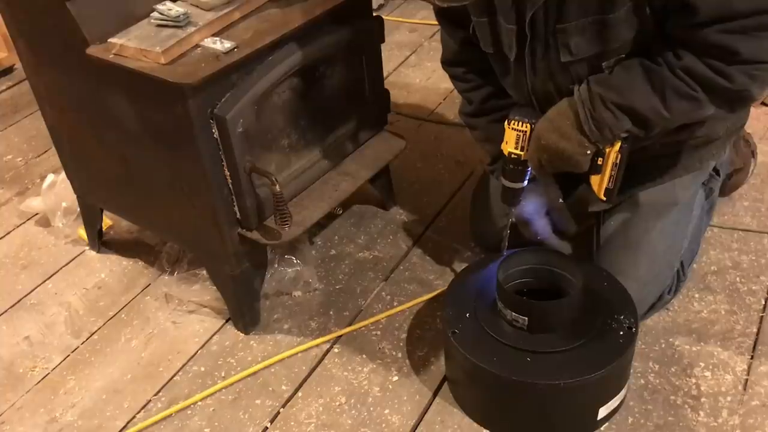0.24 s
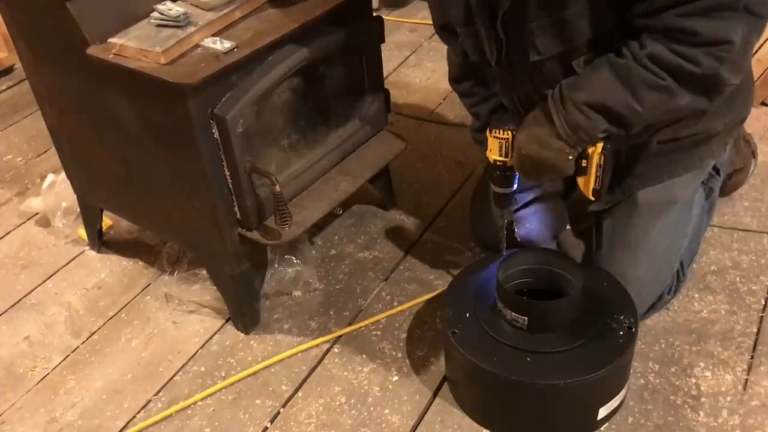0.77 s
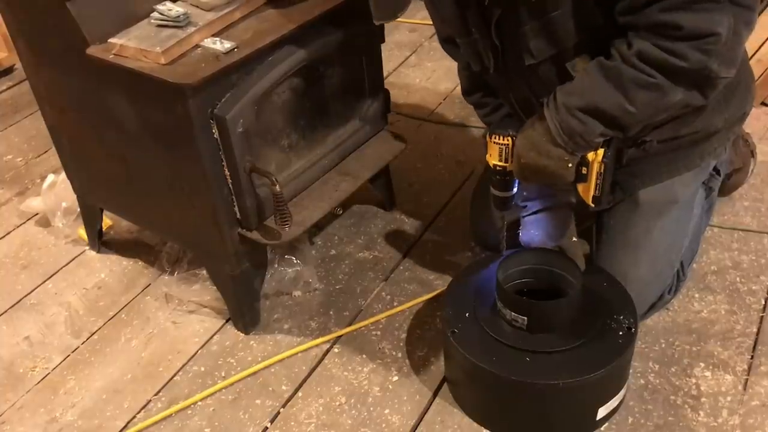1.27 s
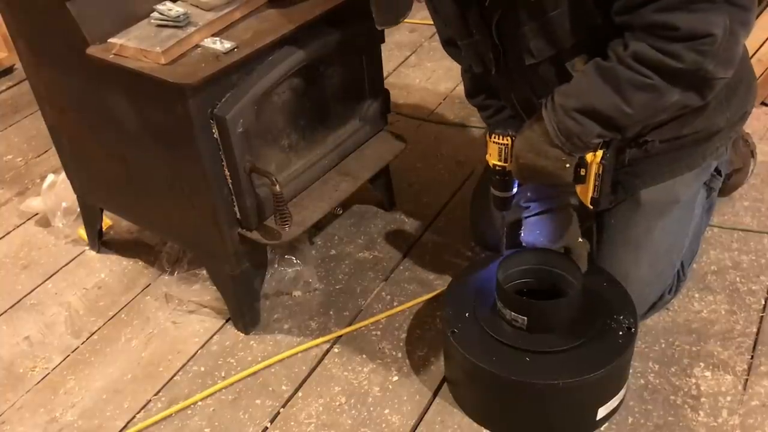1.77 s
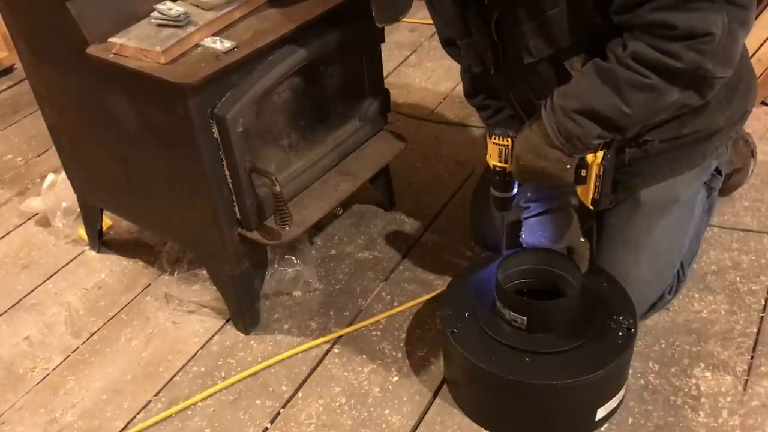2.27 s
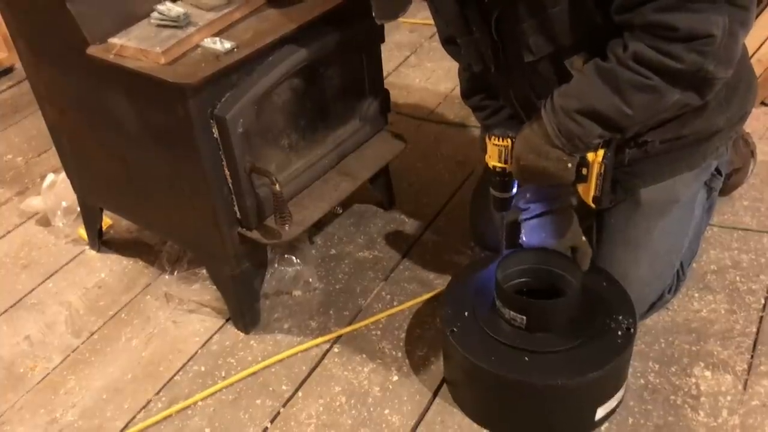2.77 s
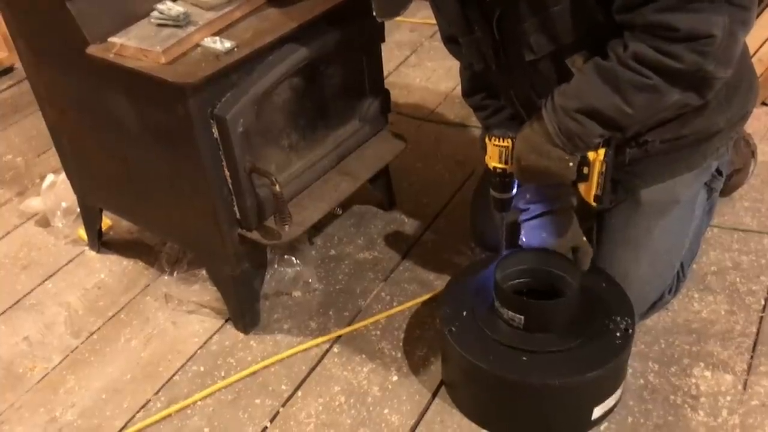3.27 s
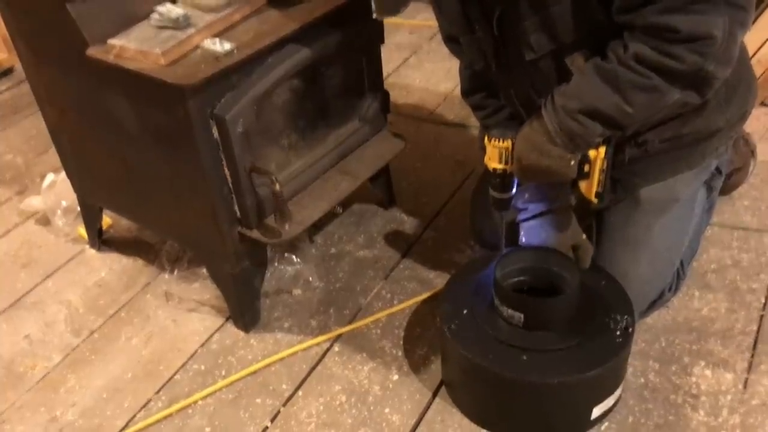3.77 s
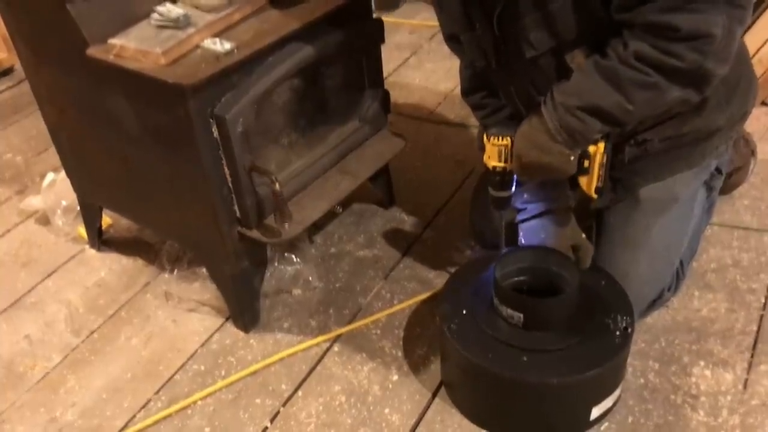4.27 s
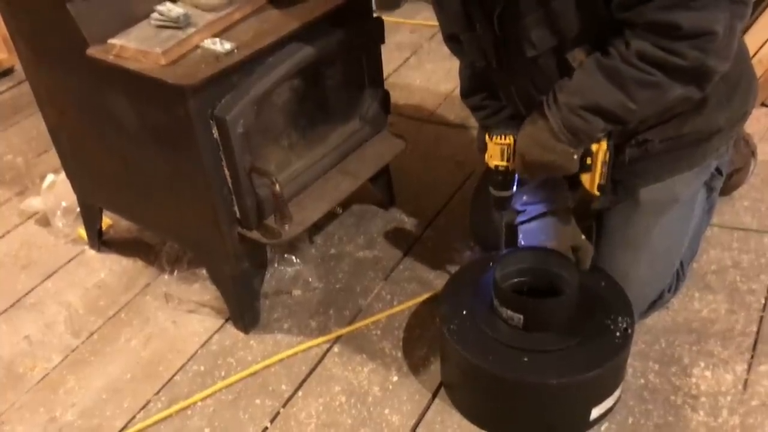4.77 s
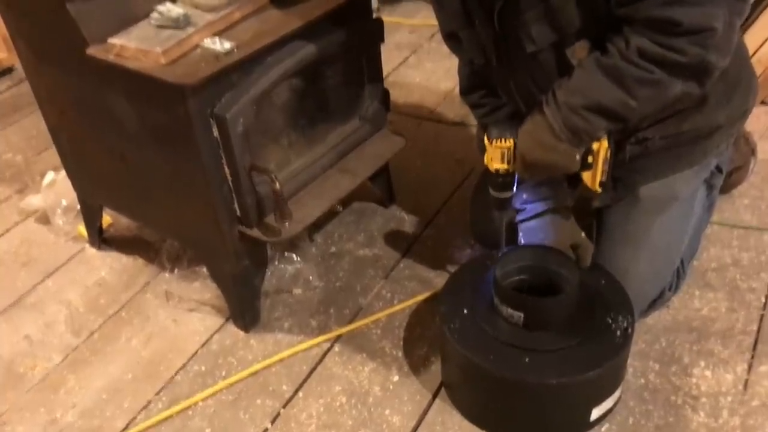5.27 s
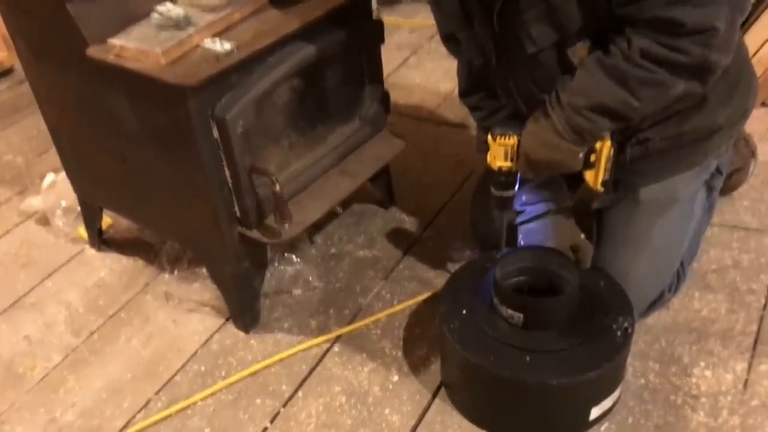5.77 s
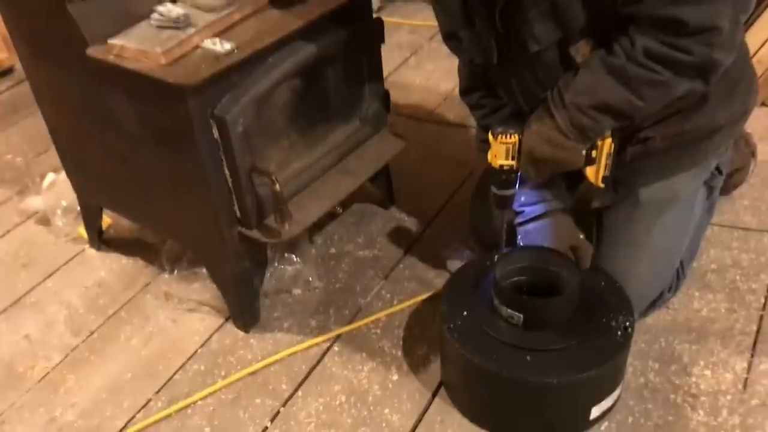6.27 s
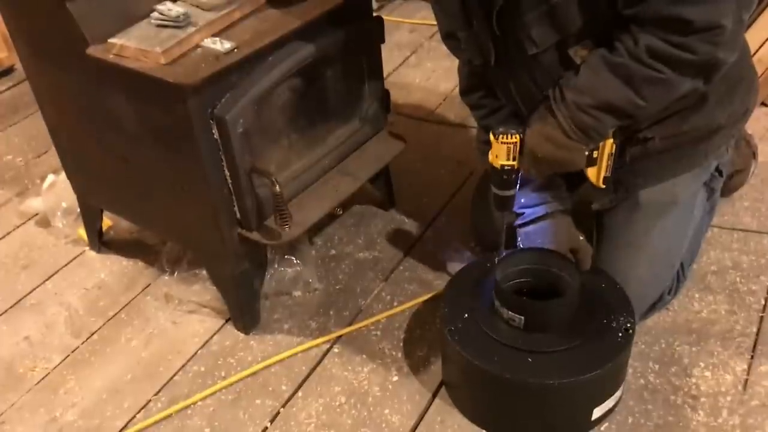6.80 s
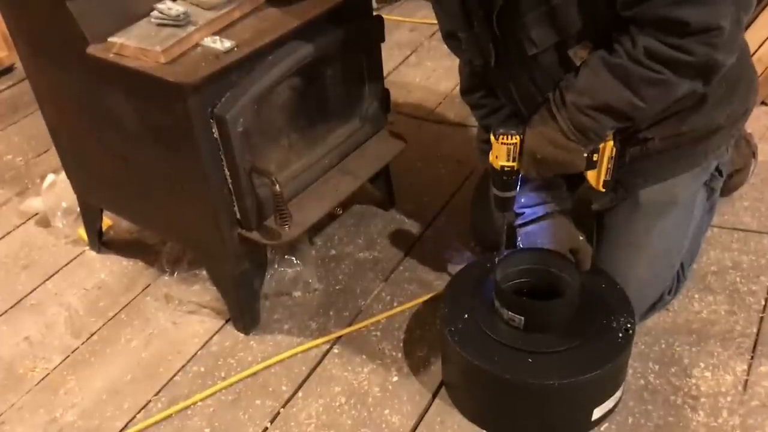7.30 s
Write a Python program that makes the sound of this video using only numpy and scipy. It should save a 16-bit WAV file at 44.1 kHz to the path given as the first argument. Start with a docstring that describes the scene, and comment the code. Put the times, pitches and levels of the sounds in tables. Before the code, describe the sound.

A cordless drill whines up and bores into a hollow steel drum, grinding and squeaking to a shrill squeal, then knocks and a short second bite.

```python
"""A faint knock and a rustle of cloth, then a cordless drill whistles, spins up and bores into a steel drum.
The gears whine and sag under load while the bit grinds, chatters and squeaks up to one held squeal.
The drill stops, the steel rings on, the drum is knocked as the drill is reseated, and it bites again.
Coloured noise makes the cutting and cloth, sines the gears and squeals, decaying modes the knocks and ring.
The workshop adds echoes and a noise floor; the loudest peaks overload the mono microphone."""
import sys
import numpy as np
from scipy import signal
from scipy.fft import rfft, irfft
from scipy.io import wavfile
from scipy.ndimage import uniform_filter1d

SR = 44100
rng = np.random.default_rng(int(sys.argv[2]) if len(sys.argv) > 2 else 0)


def unload_audio(sound):
    """Save the sound as a 16-bit wav file, at the path given as the first command line argument."""
    columns = np.transpose(np.atleast_2d(sound))
    # keep every value between -1 and 1, then stretch to whole-number steps
    steps = np.round(np.clip(columns, -1, 1) * 32767)
    wavfile.write(sys.argv[1], SR, steps.astype(np.int16))


N = 332541
T = np.arange(N) / SR  # seconds


def amp(db):
    """Decibels as a gain."""
    return 10 ** (np.asarray(db) / 20)


def unit(x):
    """Scales a signal to rms 1."""
    return x / np.sqrt(np.mean(x ** 2) + 1e-20)


def read(points, hz):
    """Reads a table over frequency, joined by straight lines in log frequency."""
    f, value = np.transpose(points)
    return np.interp(np.log(hz + 1), np.log(f + 1), value)


def curve(rows, axis):
    """One column of a table, joined by straight lines in time."""
    rows = np.asarray(rows)
    return np.interp(T, rows[:, 0], rows[:, axis])


def level(rows, axis):
    """A dB column as a gain, silent outside its rows, with softened ends."""
    inside = (T >= rows[0][0]) & (T <= rows[-1][0] + .002)
    return amp(curve(rows, axis)) * uniform_filter1d(inside * 1., size=130)


def gate(start, end, rise_s, t60):
    """Rises in a straight line, holds until the end, then dies away by 60 dB in each t60."""
    rise = np.clip((T - start) / rise_s, 0, 1)
    return rise * amp(-60 * np.clip((T - end) / t60, 0, 4))


def add(mix, s, sound):
    """Lays a short sound into the mix at a time in seconds."""
    part = mix[max(round(s * SR), 0):][:len(sound)]
    part += sound[:len(part)]


def drift(rate_hz, count=N):
    """Smooth random wander of rms 1, about as fast as the rate."""
    hz = np.fft.rfftfreq(count, 1 / SR)
    spectrum = rfft(rng.standard_normal(count)) * np.exp(-(hz / rate_hz) ** 2)
    return unit(irfft(spectrum, count))


def colour(x, points, size=4096):
    """A causal minimum-phase filter with the given spectrum; rms 1."""
    log_gain = np.log(amp(read(points, abs(np.fft.fftfreq(size, 1 / SR)))))
    taps = np.fft.ifft(np.exp(np.conj(signal.hilbert(log_gain)))).real
    return unit(signal.oaconvolve(x, taps[:size // 2])[:N])


def resonate(x, hz, width):
    """A resonance of about gain 1 at a fixed pitch; a wider one dies sooner."""
    r = np.exp(-np.pi * abs(width) / SR)
    return 2 * signal.lfilter([1 - r], [1, -r * np.exp(2j * np.pi * hz / SR)], x).real


def partials(turns, levels_db, multiples=None):
    """Sines on multiples of one rotation (plain harmonics unless given), each with its rms level."""
    if multiples is None:
        multiples = np.arange(len(levels_db)) + 1
    return sum(np.sqrt(2) * amp(db) * np.sin(2 * np.pi * k * turns) for k, db in zip(multiples, levels_db))


def chips(per_s, spread_db, rub):
    """Tiny fractures of uneven size over steady rubbing."""
    sizes = amp(spread_db * np.minimum(rng.exponential(1, N), 4)) * rng.choice([-1, 1], N)
    fractures = unit(sizes * (rng.random(N) < per_s / SR))
    return unit(fractures + rub * rng.standard_normal(N))


# noise floor spectrum: pitch_hz, relative level_db
FLOOR_SPECTRUM = [(12, -34), (28, -25), (42, 1), (59, 1.5), (135, -1.5), (774, -21.5), (2930, -33.5),
                  (3460, -28.5), (5090, -38), (6360, -31.5), (7720, -34.5), (15000, -36)]
FLOOR_DB = -48


def noise_floor():
    """Steady coloured noise under everything."""
    return amp(FLOOR_DB) * colour(rng.standard_normal(N), FLOOR_SPECTRUM)


# decay of the workshop echoes: pitch_hz, t60_s
ROOM_T60 = [(100, 0.96), (300, 0.34), (1000, 0.46), (3000, 0.39), (7000, 0.28), (15000, 0.26)]


def room(x, wet_db, size=256):
    """The workshop: dense echoes that die at their own speed in each band."""
    t = T[:SR * 3 // 4]
    taps = rng.choice([-1., 1.], len(t)) * (rng.random(len(t)) < 3000 / SR) * (t > .003)
    hz, at, bands = signal.stft(taps, SR, nperseg=size)
    decay = amp(-60 * at / read(ROOM_T60, hz)[:, None])
    tail = signal.istft(bands * decay, SR, nperseg=size)[1]
    wet = signal.fftconvolve(x, tail / np.linalg.norm(tail))[:N]
    return (x + amp(wet_db) * wet) / np.sqrt(1 + amp(wet_db) ** 2)


# each run of the drill: trigger_pulled_s, squeezed_home_s, let_go_s, controller_whistle_db
RUNS = [(1.545, 2.3, 6.305, -41), (7.16, 7.24, 7.54, -37.5)]
# gear mesh as the motor creeps, spins up, sags under load, stops and restarts: time_s, mesh_hz
SPEED = [(1.6, 688.5), (2.13, 872.5), (2.42, 2212), (2.54, 2560), (2.7, 2658), (3.05, 2495), (3.3, 2345),
         (3.95, 2083), (4.2, 1853), (6.3, 1742), (7.16, 600), (7.32, 1760)]
# weight on the drill: time_s, pressure (0-1)
PRESSURE = [(2.42, 0.1), (2.58, 0.28), (3.0, 0.53), (3.35, 0.73), (4.0, 0.81), (4.6, 1), (6.3, 1),
            (6.6, 0.21)]
# the lips snag, first breaking through the sheet, then catching on the rim of the hole:
# start_s, end_s, build_up_s, strength (about 1 = full)
SNAGS = [(5.34, 6.293, 0.53, 0.88), (7.187, 7.54, 0.086, 1.025)]
SEAT_S, STOP_T60_S, SNAG_T60_S = 0.38, 0.3, 0.44  # the bit seats itself, the brake stops it, a snag lets go


def drive():
    """The state of the drill: whether it cuts, its speed in octaves below the top, pressure and snag."""
    cutting = sum(gate(pulled, let_go, SEAT_S, STOP_T60_S) for pulled, _, let_go, _ in RUNS)
    mesh = curve(SPEED, axis=1)
    octaves = np.log2(mesh / mesh.max())
    snag = sum(strength * gate(start, end, build_s, SNAG_T60_S) for start, end, build_s, strength in SNAGS)
    return cutting, octaves, curve(PRESSURE, axis=1), snag


def follow(state, law_db):
    """The gain of one sound, from the state of the drill."""
    cutting, octaves, pressure, snag = state
    top, per_octave, pressed, snagged = law_db
    return cutting * amp(top + per_octave * octaves + pressed * pressure + snagged * snag)


# sleeve and glove rustle as the bit is placed: time_s, level_db before a common lift
RUSTLE = [(0.15, -75), (0.35, -65), (0.55, -52.5), (0.8, -58.5), (1.1, -62.5), (1.25, -58), (1.53, -76)]
# the drum rocks under the hand, or trembles as the drill coasts to a stop: start_s, end_s, level_db
SHIFTS = [(-.03, 0.003, -47), (6.3, 6.42, -37), (6.556, 6.645, -33), (6.985, 7.013, -33.5)]
# low rumble through the floor: pitch_hz, relative level_db
RUMBLE_SHAPE = [(15, -36), (30, -22), (45, -1), (70, 1.5), (100, -0.5), (140, -5), (250, -24), (800, -49)]
# hollow boom of the drum: pitch_hz, relative level_db
BOOM = [(60, -24), (120, -11), (165, -7), (198, 2), (232, 2), (275, 0), (320, -2), (400, -6), (480, -18),
        (1200, -40.5)]
# clank of the drum wall: pitch_hz, relative level_db
CLANK = [(100, -21), (220, 8), (450, -16), (700, 3), (1100, -2.5), (1600, 2), (2200, 2), (4000, -4),
         (6500, -11), (15000, -31)]


def handling():
    """Cloth rubs as grainy noise; the drum rumbles, booms and grates as it rocks or trembles."""
    cloth_spectrum = [(300, 3), (1500, 1.5), (4500, -0.5), (8000, -6), (15000, -11)]  # pitch_hz, level_db
    rubbing = colour(chips(per_s=2000, spread_db=1, rub=1), cloth_spectrum)
    cloth = amp(3.5) * level(RUSTLE, axis=1) * rubbing
    shifting = sum(amp(db) * gate(start, end, rise_s=0.02, t60=1) for start, end, db in SHIFTS)
    grate = amp(-4.0) * colour(chips(per_s=700, spread_db=0.5, rub=0.77), CLANK)
    boards = amp(-5.5) * colour(rng.standard_normal(N), RUMBLE_SHAPE)
    hollow = colour(rng.standard_normal(N), BOOM)
    return cloth + shifting * (boards + hollow + grate)


# the tool knocks on the drum: time_s, thud_db and clank_db before common lifts, sharpness (0-1)
KNOCKS = [(0.002, -32, -45, 0.1), (1.546, -61, -43.5, 0.12), (3.6, -22.5, -9, 0.4),
          (6.602, -25.5, -29, 0.18), (6.63, -28.5, -23.5, 0.46), (6.716, -26.5, -32, 0.2),
          (6.742, -24.5, -38, 0.7), (6.839, -40, -40, 0.83), (7.008, -27, -23, 0.08),
          (7.164, -42, -18.5, 0.89)]
# modes of the lid: pitch_hz, relative level_db, t60_s
LID = [(184, -4, 0.095), (230, 0, .12), (270, -5.5, .15), (323.2, -2.5, 0.3), (591, -17.5, 0.28),
       (1012, -20.5, .4), (1199, -18, 0.3), (1283, -20, 0.31), (1355, -23, 0.26)]
# resonances of the drum wall and the bit: pitch_hz, width_hz, relative level_db
STEEL = [(1006, 113, 5.5), (1550, 71, -5), (1904, 25, 1), (2120, 51, -5.5), (3170, 130, 1), (3404, 120, 6),
         (3623, 150, 6.5), (4460, 140, 3.5), (5410, 110, -2.5), (5850, 81, 0), (6000, 90, -8),
         (6470, 190, -4), (7260, 200, -32), (7580, 80, -9), (8650, 220, -10), (8900, 140, -15),
         (9800, 150, -16), (11800, 150, -19.5)]
# bright tick of steel on steel: pitch_hz, relative level_db
TICK = [(300, -21), (2000, -4.5), (4000, 2), (7000, -3.5), (10000, -2.5), (15000, -2)]
CLANK_T60_S, CLANK_RISE_S = 0.077, .001


def knocks():
    """Each knock gives a hollow thud of the lid and a clank of the wall; steel on steel adds a bright tick."""
    t = T[:SR // 2]
    thuds, dull, sharp = np.zeros((3, N))
    modes = sum(amp(db - 60 * t / t60) * np.sin(2 * np.pi * hz * t) for hz, db, t60 in LID)
    lid = modes * (1 - np.exp(-t / 0.0011))
    for s, thud_db, clank_db, sharpness in KNOCKS:
        add(thuds, s, amp(thud_db + 4) * lid)
        blow = amp(clank_db + 4.5 - 60 * t / CLANK_T60_S) * np.minimum(t / CLANK_RISE_S, 1)
        add(dull, s, (1 - sharpness) * blow)
        add(sharp, s, sharpness * blow)
    rattle = chips(per_s=3000, spread_db=1.2, rub=0.9)
    wall = sum(amp(db) * resonate(dull * rattle, hz, width) for hz, width, db in STEEL)
    clank = dull * colour(rattle, CLANK)
    tick = sharp * colour(rattle, TICK)
    return thuds + clank + tick + amp(-7.0) * wall


# the steel rings on when the bit lets go: pitch_hz, level_db, t60_s
FREE_RING = [(3070, -9.5, .58), (6040, -34, .45), (6659, -32.5, 0.38), (7160, -33, 0.77), (13950, -26, .22)]


def ring_down():
    """Freed from the bit at the end of the first run, the modes of the steel die away smoothly."""
    t, out = T[:SR], np.zeros(N)
    ring = sum(np.sqrt(2) * amp(db - 60 * t / t60) * np.sin(2 * np.pi * hz * t) for hz, db, t60 in FREE_RING)
    add(out, RUNS[0][2], ring * (1 - np.exp(-t / .01)))
    return out


# multiples of the gear mesh heard in the whine (ratio)
GEAR_MULTIPLES = [1 / 7, 2 / 7, 3 / 7, 6 / 7, 1, 2, 3]
# each of those multiples before the housing: level_db
GEAR_DB = [-12, -6, -2, -12, -4, -4.5, -17]
# response of the drill housing: pitch_hz, gain_db
HOUSING = [(150, -11), (280, -0.5), (400, -4.5), (600, -4), (850, -18), (1250, -9), (1580, 12), (1900, 0.5),
           (2350, 7), (2700, -5), (3500, 11.5), (5000, 6), (9000, 2.5)]
# how the whine follows the drill: top_speed_db, per_octave_db, full_pressure_db, full_snag_db
WHINE_LAW = (-32, 10, 0, -13)
# harmonics of the controller whistle: relative level_db
SWITCH_DB = [-3, -1, -11]
SWITCH_HZ, WHISTLE_T60_S = 3947, 1.6  # the whistle fades once the trigger is home


def motor(state):
    """Gear teeth whine through the housing, unsteady when slow or loaded; the speed controller whistles."""
    mesh = curve(SPEED, axis=1)
    _, octaves, pressure, _ = state
    shake = .003 + .018 * pressure ** 3 - .016 * octaves  # share of the pitch
    turns = np.cumsum(mesh * (1 + shake * drift(rate_hz=180))) / SR
    teeth_db = [db + read(HOUSING, k * mesh) for k, db in zip(GEAR_MULTIPLES, GEAR_DB)]
    teeth = partials(turns, teeth_db, GEAR_MULTIPLES)
    flutter = amp(2.7 * drift(rate_hz=110) + 1.5 * drift(rate_hz=12))
    whine = follow(state, WHINE_LAW) * teeth * flutter
    switching = SWITCH_HZ * np.cumsum(1 + 0.0015 * drift(rate_hz=140)) / SR
    part_way = sum(amp(db) * gate(pulled, home, .003, WHISTLE_T60_S) for pulled, home, _, db in RUNS)
    return whine + part_way * partials(switching, SWITCH_DB)


def slipping(hz, jitter, jitter_hz, flutter_db, levels_db, multiples=None, count=N):
    """A stick-slip tone whose pitch and strength never hold still."""
    turns = np.cumsum(hz * (1 + jitter * drift(jitter_hz, count))) / SR
    flutter = unit(amp(flutter_db * drift(jitter_hz, count)))
    return partials(turns, levels_db, multiples) * flutter


# the bit sticks and slips in short squeaks: start_s, decay_s (time constant), pitch_hz, level_db
SQUEAKS = [(3.973, 0.023, 2453, -17.5), (4.083, 0.011, 2483, -16), (4.205, .007, 2480, -7),
           (4.265, 0.015, 2520, -10.5), (4.371, .015, 2550, -18), (4.48, 0.0089, 2553, -15.5),
           (4.553, .018, 2593, -12.5), (4.659, 0.011, 2600, -7.5), (4.729, 0.021, 2545, -11.5),
           (4.876, .028, 2596, -8), (4.959, .03, 2572, -3), (4.975, 0.027, 5980, -21),
           (5.223, 0.019, 2638, -3), (5.23, .02, 5281, -16.5), (5.297, 0.012, 2560, -9),
           (5.371, 0.025, 2490, -10), (5.494, 0.027, 2637, -11), (5.544, .02, 2573, -9.5),
           (5.616, 0.011, 2730, -4.5), (5.62, 0.017, 6060, -11.5), (5.665, 0.015, 2643, -7),
           (5.69, .04, 7220, -17), (5.851, 0.021, 6410, -8.5), (5.919, 0.014, 2697, -7.5),
           (5.956, 0.025, 2656, -9), (6, 0.013, 7100, -0.5), (6.135, 0.028, 5800, -8.5),
           (6.283, 0.019, 6660, -5.5), (6.295, .02, 14200, -16), (7.25, 0.016, 1920, -10),
           (7.344, 0.032, 6600, -10), (7.364, .009, 5400, -7.5), (7.368, 0.0062, 10950, -8),
           (7.401, 0.021, 6230, -5), (7.481, 0.013, 10000, -9.5), (7.528, 0.02, 4490, -1)]
# harmonics of a squeak or screech: relative level_db
SQUEAK_DB = [0.5, -17.5]
# rough screech under the squeaks: start_s, end_s, first_pitch_hz, last_pitch_hz, level_db, jitter (share)
SCREECHES = [(3.95, 4.329, 2451, 2530, -30, 0.034), (4.475, 5.18, 2572, 2595, -19.5, .03),
             (5.401, 6.07, 2594, 2684, -17.5, .03), (7.191, 7.251, 1800, 1946, -25, 0.0797),
             (7.25, 7.469, 1921, 2228, -12, 0.0549)]
# partials of the held squeal: multiple of its pitch (ratio)
SQUEAL_MULTIPLES = [1 / 3, 1, 2]
# each of those partials: level_db
SQUEAL_DB = [-28.5, -5.5, -17.5]
SQUEAK_RISE_S, SQUEAK_HOLD_S = 0.0043, 0.0094  # the hold includes the rise
SCREECH_RISE_S, SCREECH_T60_S, SCREECH_SURGE_DB = 0.012, .2, 4
SQUEAL_START_S, SQUEAL_END_S, SQUEAL_RISE_S, SQUEAL_T60_S = 6.075, 6.35, .01, 0.082
SQUEAL_GLIDE_S, SQUEAL_FROM_HZ = .235, 2860


def squeals():
    """Stick-slip tones: short squeaks over a rough screech, and a squeal climbing to the steel's free ring."""
    out = np.zeros(N)
    t = T[:SR // 8]
    for s, decay_s, hz, db in SQUEAKS:
        swell = np.minimum(t / SQUEAK_RISE_S, 1) * np.exp(-np.maximum(t - SQUEAK_HOLD_S, 0) / decay_s)
        jitter = read([(2600, 0.02), (6500, 0.045), (14000, .012)], hz)  # pitch_hz, jitter as a share
        harmonics_db = SQUEAK_DB if hz < SR / 5 else SQUEAK_DB[:1]
        squeak = slipping(hz, jitter, jitter_hz=386, flutter_db=3.0, levels_db=harmonics_db, count=len(t))
        add(out, s, amp(db) * swell * squeak)
    for start, end, first_hz, last_hz, db, jitter in SCREECHES:
        pitch = np.interp(T, [start, end], [first_hz, last_hz])
        surge = amp(db + SCREECH_SURGE_DB * drift(rate_hz=28))
        screech = slipping(pitch, jitter, jitter_hz=257.2, flutter_db=5.5, levels_db=SQUEAK_DB)
        out += surge * gate(start, end, SCREECH_RISE_S, SCREECH_T60_S) * screech
    pitch = np.interp(T - SQUEAL_START_S, [0, SQUEAL_GLIDE_S], [SQUEAL_FROM_HZ, FREE_RING[0][0]])
    held = slipping(pitch, jitter=0.00698, jitter_hz=170, flutter_db=6.5,
                    levels_db=SQUEAL_DB, multiples=SQUEAL_MULTIPLES)
    return out + gate(SQUEAL_START_S, SQUEAL_END_S, SQUEAL_RISE_S, SQUEAL_T60_S) * held


# how the chatter follows the drill: top_speed_db, per_octave_db, full_pressure_db, full_snag_db
CHATTER_LAW = (-39.5, 0.5, 18, 10)
LOOSE_DB = 16.5  # back in the open hole, the bit rattles harder against the rim


def chatter(state):
    """The bit judders in the hole, feeding now one resonance of the steel, now another."""
    judder = chips(per_s=900, spread_db=3.5, rub=0.62)
    slow_t = T[::100]
    ring = np.zeros(N)
    for hz, width, db in STEEL:
        feed_db = 3.5 * unit(uniform_filter1d(rng.standard_normal(len(slow_t)), size=12))
        feed = np.interp(T, slow_t, amp(feed_db))
        ring += amp(db) * resonate(judder, hz, width) * feed
    loose = amp(LOOSE_DB * (T > RUNS[1][0]))  # from the second run on
    return loose * follow(state, CHATTER_LAW) * unit(ring)


# hiss of the cutting edge: pitch_hz, relative level_db
HISS = [(1200, -13.5), (2300, 5), (3300, 1.5), (4500, 5.5), (5200, -4), (6000, 3), (7200, 1.5), (7800, -3),
        (9500, -2), (10400, -8.5), (11200, -4.5), (13000, -6.5), (15700, -14)]
# scrape of the sheet: pitch_hz, relative level_db
SCRAPE = [(250, -19), (480, -7), (590, 5), (720, -0.5), (1000, -4.5), (1600, 2), (2200, 6.5), (3200, -22.5),
          (8000, -40.5)]
# a lip grabs a thick chip and shakes the drum: time_s, change_db
GRABS = [(3.38, 5), (3.98, 2.5), (4.22, 3.5), (4.59, 1.5), (4.92, 4), (5.8, 10), (6.05, 8.5), (6.18, -1.5)]
GRAB_S, GRAB_SCRAPE_SHARE = .04, 0.51  # half-width of a grab (to 1/e); share of its dB heard in the scrape
# how the hiss follows the drill: top_speed_db, per_octave_db, full_pressure_db, full_snag_db
HISS_LAW = (-21, 6.5, 1.5, 14)
# the same columns for the scrape: top_speed_db, per_octave_db, full_pressure_db, full_snag_db
SCRAPE_LAW = (-31.5, 3.5, 11.5, 5)
# the same columns for the boom: top_speed_db, per_octave_db, full_pressure_db, full_snag_db
BOOM_LAW = (-38, 4, 18.5, -2)
# the same columns for the rumble: top_speed_db, per_octave_db, full_pressure_db, full_snag_db
RUMBLE_LAW = (-37.5, 5.5, 9.5, -0.5)


def grinding(state):
    """The two lips of the bit tear chips; the cutting hisses, shakes the drum and reaches the floor."""
    lip_turns = np.cumsum(curve(SPEED, axis=1)) / SR / 75  # the gearbox slows the bit
    bite = amp(1.0 * np.sin(2 * np.pi * lip_turns) + 2.1 * drift(rate_hz=22.7))
    tears = chips(per_s=2500, spread_db=3.5, rub=1.0) * bite
    heavy_tears = chips(per_s=400, spread_db=3, rub=0.6) * bite
    grab_db = sum(db * np.exp(-((T - s) / GRAB_S) ** 2) for s, db in GRABS)
    hiss = follow(state, HISS_LAW) * colour(tears, HISS)
    scrape = follow(state, SCRAPE_LAW) * amp(GRAB_SCRAPE_SHARE * grab_db) * colour(tears, SCRAPE)
    boom = follow(state, BOOM_LAW) * amp(grab_db) * colour(heavy_tears, BOOM)
    rumble = follow(state, RUMBLE_LAW) * colour(rng.standard_normal(N) * bite, RUMBLE_SHAPE)
    return hiss + scrape + boom + rumble


def scene():
    """The drill and drum in the workshop over the noise floor, the same in both channels."""
    state = drive()
    drum = handling() + knocks() + ring_down()
    drill = motor(state) + squeals() + chatter(state) + grinding(state)
    mono = room(drum + drill, wet_db=-6) + noise_floor()
    return np.array([mono, mono])


EDGE_HZ = 15750  # top of the microphone's band


def record(dry):
    """The microphone overloads: loud peaks flatten against full scale; then the band limit."""
    clipped = dry / (1 + dry ** 8) ** (1 / 8)
    low_pass = signal.firwin(511, EDGE_HZ, window=("kaiser", 9), fs=SR)
    return signal.oaconvolve(clipped, low_pass[None], "same")


dry = scene()
out = record(dry)
unload_audio(out)
```